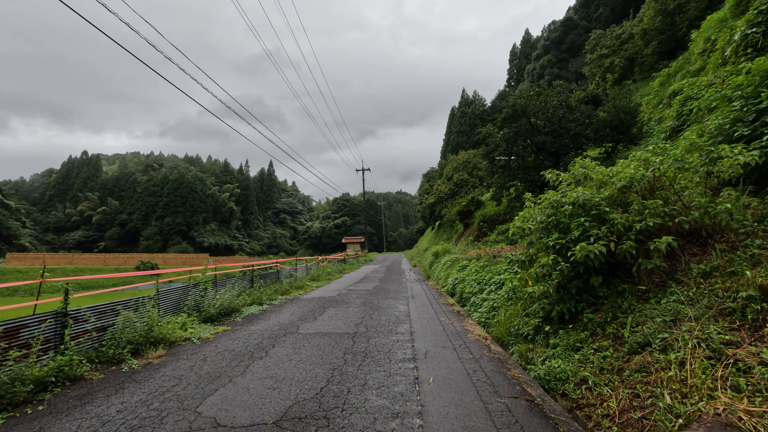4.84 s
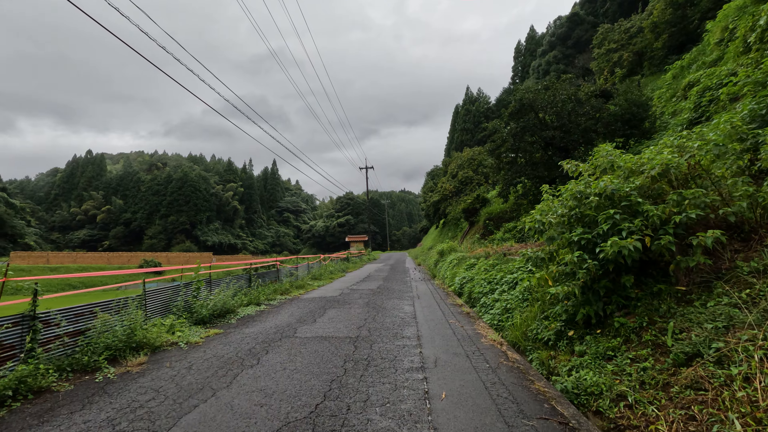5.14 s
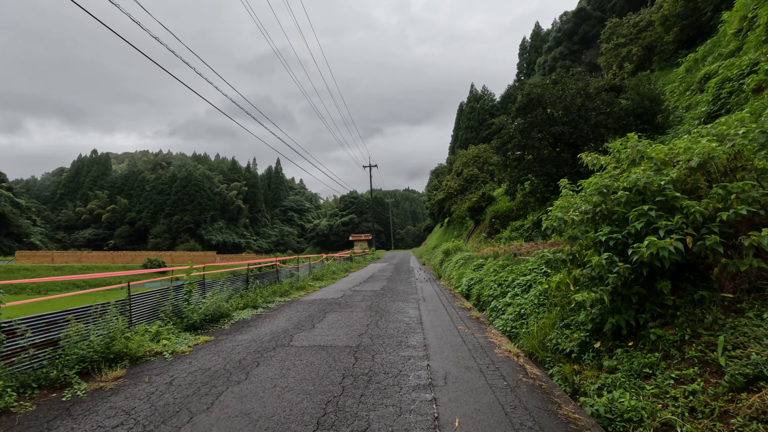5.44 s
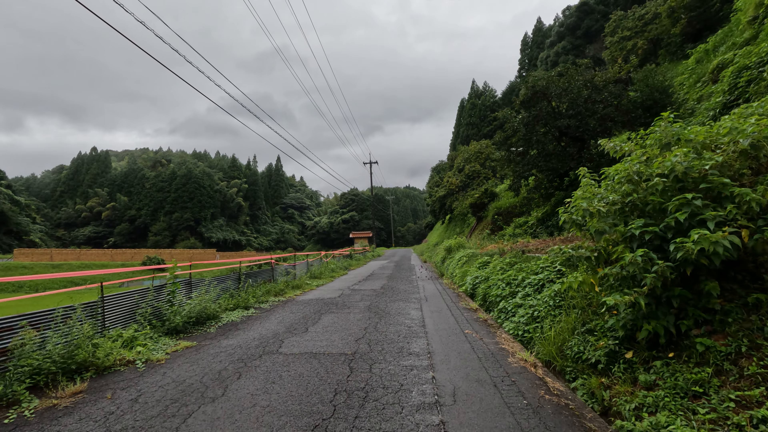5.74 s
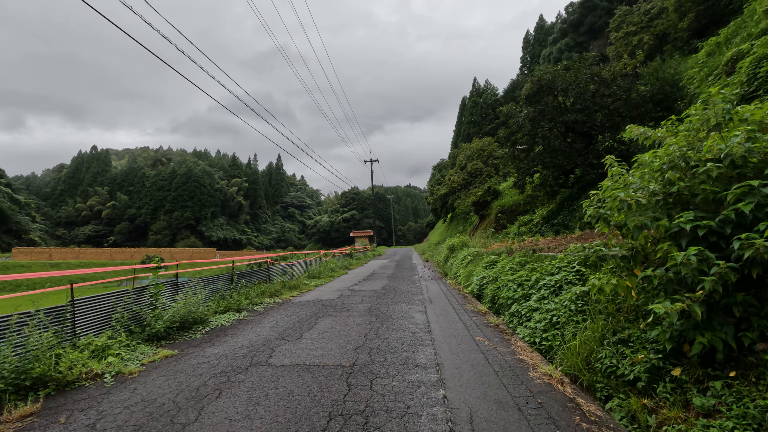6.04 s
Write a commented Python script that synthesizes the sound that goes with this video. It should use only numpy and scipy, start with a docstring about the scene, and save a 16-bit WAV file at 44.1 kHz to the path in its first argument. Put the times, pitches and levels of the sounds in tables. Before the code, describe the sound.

Footsteps on a damp paved country road run from start to end, about six seconds, at roughly two steps a second. Each is a soft, low thud with a little grit grinding under the sole; the crunchiest come at about 1, 2 and 2.5 seconds. All around, distant crickets blend into a steady high shimmer. Nearer ones stand out: a few slurred notes on the left in the first half second, a fast pipping trill that fades by 2 seconds, and rolling chirps from about 0.6 seconds onward, mixed with quicker, higher chirps in short bouts. Very faint, thin insect buzzes occur between 0.8 and 2 seconds. Another pipping trill emerges near 3.7 seconds and becomes strong from 4.9 seconds, with a thin trill on the right. Air rumbles softly throughout on the moving microphone, pulsing slightly after each footfall.

```python
"""A damp country road between fields and a wooded bank. Someone walks along it: each step thuds and
grinds a little grit on the asphalt. Crickets sing all around, drawing scraper over file: a few near
ones in down-swept syllables, many far off as a steady shimmer. Air rumbles softly on the moving
microphone, which bobs after each footfall."""
import sys
import numpy as np
from scipy import signal
from scipy.fft import rfft, irfft, next_fast_len
from scipy.io import wavfile
from scipy.ndimage import uniform_filter1d

SR = 44100
rng = np.random.default_rng(int(sys.argv[2]) if len(sys.argv) > 2 else 0)


def transcribe(u):
    """Save the signal u as a 16-bit wav file named by the first command-line argument.

    u: samples, shape (n,) or (channels, n), limited to [-1, 1]; the rate is SR.
    q: integer samples, one column per channel.
    """
    v = np.clip(np.atleast_2d(u).T, -1, 1)
    q = np.round(v * 32767).astype(np.int16)
    wavfile.write(sys.argv[1], SR, q)


N = 267995
FFT_SIZE = next_fast_len(N, True)
TIME_S = np.arange(N) / SR
FREQS_HZ = np.maximum(np.fft.rfftfreq(FFT_SIZE, 1 / SR), 1)

# Each row: heel strike in seconds, heel thud in dB, its pitch in Hz, heel grit in dB, crunch pitch in Hz,
# heel-to-sole delay in seconds, sole thud in dB, sole grit in dB. Levels are relative.
STEPS = [(0.022, -28, 149.4, -42.5, 1420, 0.061, -31.5, -41.5),
         (0.551, -29, 163, -43.5, 1100, 0.021, -28.5, -55),
         (1.001, -40.5, 215.5, -28.5, 980, 0.054, -28, -41.5),
         (1.571, -26.5, 244, -39, 1070, 0.067, -36, -44.5), (2.023, -30, 240, -29, 1220, 0.056, -27, -40),
         (2.519, -33, 330, -34.5, 1060, 0.068, -31, -31), (3.105, -31, 143, -38.5, 1630, 0.064, -28, -48.5),
         (3.608, -28, 223, -41, 1410, 0.015, -30.5, -35), (4.146, -29, 160, -40, 1280, 0.060, -30, -39.5),
         (4.669, -35.5, 115, -43.5, 950, 0.063, -29.5, -41),
         (5.175, -29, 124, -43, 1510, 0.073, -35, -45.5), (5.699, -31, 111, -39.5, 1370, 0.081, -30, -39)]


def walker(roll_db=-17, scuff_db=-17, crackle_db=-30):
    """Thuds and grit; the sole rolls on after each thud and scuffs more with more load and grit."""
    touches = contacts()
    load = pressure([(s, db) for s, db, *_ in touches], settle_s=0.038, brush_s=0.013)
    rubs = [(s, (thud_db + grit_db) / 2) for s, thud_db, _, grit_db, _ in touches]
    rubbing = pressure(rubs, settle_s=0.041, brush_s=0.051)
    roll = from_db(roll_db) * unit_rms(band(rng.standard_normal(N), 88, 335, order=3))
    scuff = from_db(scuff_db) * unit_rms(band(rough_noise(depth_db=3.9, rate_hz=200), 246, 1410))
    crackle = from_db(crackle_db) * unit_rms(band(rough_noise(depth_db=7.6, rate_hz=460), 2000, 3160))
    gritty = scattered(grit() + rubbing * (scuff + crackle), tail_db=-10.5, t60_s=0.19, early_db=-14)
    return thuds() + load * roll + panned(gritty, pan_db=-3)


def contacts(sole_hz=164, stone_hz=1600, settle_s=0.019, toe_s=0.16):
    """Every touch of shoe on road: time in s, thud in dB and Hz, grit in dB and Hz."""
    # Loose stones underfoot. Each row: time in seconds, thud and grit in relative dB.
    stones = [(0.651, -41, -43.5), (1.033, -32.5, -42), (1.101, -34.5, -39.5), (2.053, -29, -35),
              (2.126, -32.5, -33.5), (2.661, -34.5, -49.5), (3.337, -56, -45.5), (5.154, -47, -42)]
    rows = [(s, thud_db, sole_hz, grit_db, stone_hz) for s, thud_db, grit_db in stones]
    for s, heel_db, heel_hz, heel_grit_db, crunch_hz, delay_s, sole_db, sole_grit_db in STEPS:
        rows += [(s, heel_db, heel_hz, heel_grit_db, crunch_hz),
                 (s + settle_s, heel_db - 10, sole_hz, -51.5, crunch_hz),  # heel settles
                 (s + delay_s, sole_db, sole_hz, sole_grit_db, crunch_hz),
                 (s + toe_s, -40.5, 112, -59.5, crunch_hz)]  # toe comes down
    return rows


def thuds(gain_db=3, lag_s=0.002, width_cycles=0.6, weight_db=-7, weight_hz=80,
          knock_db=-9, knock_s=0.008):
    """Each load on the soft sole: a rounded push, a slower one from body weight, a short knock."""
    out = np.zeros(N)
    t = np.arange(-SR // 30, SR // 30) / SR
    age_s = np.maximum(t, 0)
    for s, db, hz, *_ in contacts():
        push = np.cos(2 * np.pi * hz * t) * np.exp(-(t * hz / width_cycles) ** 2)
        weight = np.sin(2 * np.pi * weight_hz * t) * np.exp(-(t * weight_hz / width_cycles) ** 2)
        knock_hz = 330 * rng.uniform(0.7, 1.27)
        knock = np.sin(2 * np.pi * knock_hz * age_s) * np.exp(-age_s / knock_s)
        thud = push + from_db(weight_db) * weight - from_db(knock_db) * knock
        add(out, s + lag_s + t[0], from_db(db + gain_db) * thud)
    return out


def grit(gain_db=-3.1, grain_spread_db=5.5, min_rise_s=0.0038, min_lead_s=0.003, drag_per_db=0.0351):
    """Wet grains crack under the sole in clusters; the lighter the touch, the longer it drags."""
    out = np.zeros(N)
    t = np.arange(SR // 20) / SR
    hardest_db = max(db for *_, db, hz in contacts())
    for s, *_, db, hz in contacts():
        grains = rng.standard_normal(len(t)) * from_db(grain_spread_db * rng.standard_normal(len(t)))
        stretch = 1 + drag_per_db * (hardest_db - db)
        age = t / (min_rise_s * stretch)
        crunch = unit_rms(band(grains, hz * 0.29, hz * 1.3, order=1)) * (age * np.exp(1 - age)) ** 2
        add(out, s - min_lead_s * stretch, from_db(db + gain_db) * crunch)
    return band(out, 200, 3150, order=4) + from_db(-11) * band(out, 3500, 9000)


def pressure(touches, settle_s, brush_s):
    """Shoe load after touches of (s, dB): brushes in, dies away."""
    energy = np.zeros(N)
    for s, db in touches:
        add(energy, s, from_db([2 * db]))
    load = np.sqrt(signal.lfilter([1], [1, -np.exp(-1 / (settle_s * SR))], energy + 1e-18))
    return uniform_filter1d(load, size=int(brush_s * SR))


def add_syllable(track, middle_s, db, hz, fall, length_s, rough, grip_db=3.5):
    """One wing stroke: the scraper slows along the file, so the tone falls; its grip is uneven."""
    progress = np.linspace(0, 1, max(int(length_s * SR), 8))
    wobble, grip = (np.interp(progress, np.linspace(0, 1, 8), row) for row in rng.standard_normal((2, 8)))
    sweep = 3 / 8 - (progress + progress ** 2) / 2
    pitch_hz = hz * (1 + fall * sweep + rough * wobble)
    envelope = from_db(db + grip_db * grip) * np.sin(np.pi * progress)
    add(track, middle_s - length_s / 2, envelope * np.sin(2 * np.pi * np.cumsum(pitch_hz) / SR))


def low_cricket(chirp_period_s=0.258, syllables_per_s=47, climb=0.0099, taper_db=0.87, gain_db=6):
    """Rolling eight-syllable chirps that swell and trail off, climbing a little in pitch."""
    # Each row: first and last chirp in seconds.
    bouts = [(0.643, 5.275), (5.58, 5.838)]
    # Song as the walker passes. Each row: time in seconds, relative level in dB, pitch in Hz.
    song = [(0.6, -50, 3880), (2.1, -51.5, 3784), (2.9, -47, 3805), (4.5, -45, 3810), (5.1, -44, 3890),
            (5.7, -53, 3895)]
    times_s, levels_db, pitches_hz = np.transpose(song)
    out = np.zeros(N)
    for first_s, last_s in bouts:
        for s in call_times(first_s, last_s, chirp_period_s):
            for k in range(-3, 5):
                jitter, detune, stray_db = rng.standard_normal(3)
                hz = np.interp(s, times_s, pitches_hz) * (1 + climb * k + 0.0066 * detune)
                db = np.interp(s, times_s, levels_db) + gain_db - taper_db * k * k + stray_db
                middle_s = s + k / syllables_per_s + 0.0004 * jitter
                add_syllable(out, middle_s, db, hz, fall=0.21, length_s=0.026, rough=0.012)
    return panned(scattered(out, tail_db=-13, t60_s=0.074), pan_db=-1.5)


def quick_crickets(chirp_period_s=0.139, syllables_per_s=67, sag=0.015, taper_db=0.95, gain_db=3):
    """Chirps of five steeply falling syllables; strength and pitch vary from chirp to chirp."""
    # Each row: first and last chirp in seconds, relative level in dB, pitch in Hz.
    bouts = [(0.185, 0.905, -44.3, 4790), (1.154, 1.258, -48, 5150), (1.684, 2.26, -43.5, 5170),
             (2.02, 2.73, -45, 4720), (2.64, 3.05, -44.5, 5070), (3.23, 3.65, -50, 5120),
             (3.875, 4.93, -47.5, 4920), (5.33, 5.59, -46.5, 5330), (5.73, 5.995, -43, 5200)]
    out = np.zeros(N)
    for first_s, last_s, bout_db, bout_hz in bouts:
        for s in call_times(first_s, last_s, chirp_period_s):
            weakness, tuning = rng.standard_normal(2)
            for k in range(-2, 3):
                jitter, detune, stray_db = rng.standard_normal(3)
                db = bout_db + gain_db - 0.6 * weakness - taper_db * k * k + stray_db
                hz = bout_hz * (1 + 0.0078 * tuning - sag * k + 0.009 * detune)
                middle_s = s + k / syllables_per_s + 0.0004 * jitter
                add_syllable(out, middle_s, db, hz, fall=0.27, length_s=0.013, rough=0.01)
    return panned(scattered(out, tail_db=-8.5, t60_s=0.045, early_db=-6.5), pan_db=-2.8)


def slurring_cricket(period_s=0.069):
    """A few long, slow wing strokes from the field side."""
    # Each row: first and last note in seconds, level in dB.
    bouts = [(0.013, 0.358, -42.5), (0.47, 0.53, -50)]
    out = np.zeros(N)
    for first_s, last_s, db in bouts:
        for s in call_times(first_s, last_s, period_s):
            add_syllable(out, s, db, hz=3606, fall=0.164, length_s=0.046, rough=0.005)
    return panned(scattered(out, tail_db=-3, t60_s=0.32), pan_db=5.5)


def steady_crickets():
    """Two pipping crickets, one left behind and one approached, and a thin trill in the verge."""
    # Each row of all three: time in seconds, level in dB.
    behind_levels = [(0, -38.5), (0.45, -43.5), (0.7, -40.5), (1.4, -39), (1.8, -54), (3.5, -67)]
    ahead_levels = [(2.5, -66), (3.7, -51), (4.35, -51), (4.84, -57), (4.89, -42.5), (6.08, -42.5)]
    verge_levels = [(0, -65), (2.5, -62), (4, -62), (5.4, -51.5), (6.08, -54.5)]
    behind = trill(behind_levels, first_s=0.0145, period_s=0.0484, hz=5720, fall=0.03, length_s=0.021)
    ahead = trill(ahead_levels, first_s=0.0265, period_s=0.04775, hz=5910, fall=0.02, length_s=0.018)
    verge = trill(verge_levels, first_s=0.0174, period_s=0.0302, hz=8380, fall=0.18, length_s=0.025,
                  rough=0.012)
    behind = scattered(behind, tail_db=0.5, t60_s=0.073, early_db=-8.5)
    ahead = scattered(ahead, tail_db=-24, t60_s=0.063, early_db=-18)
    verge = scattered(verge, tail_db=-8, t60_s=0.12, early_db=-6)
    return panned(behind + ahead, pan_db=-2) + panned(verge, pan_db=-11.5)


def trill(levels, first_s, period_s, hz, fall, length_s, rough=0.005):
    """An unbroken train of wing strokes following a level curve."""
    out = np.zeros(N)
    for s in np.arange(first_s, N / SR, period_s):
        effort, detune = rng.standard_normal(2)
        db = np.interp(s, *np.transpose(levels)) + 0.49 * effort
        add_syllable(out, s, db, hz * (1 + 0.0035 * detune), fall, length_s, rough)
    return out


def far_chorus(blur_db=-1):
    """Far crickets merge into one shimmering band per kind."""
    # Each row: centre and spread in Hz, level in dB, left minus right in dB, syllables per second.
    choirs = [(3827, 280, -54, -1, 47), (5043, 290, -52, -2.5, 66), (5600, 216, -49.5, -1, 42),
              (7682, 318, -49, -6, 38)]
    out = 0
    for hz, spread_hz, db, pan_db, syllables_per_s in choirs:
        song_band = bell_band(hz, spread_hz)
        distant = scattered(singers(hz, syllables_per_s), tail_db=-1, t60_s=0.49)
        in_band = irfft(rfft(distant, FFT_SIZE) * np.sqrt(song_band), FFT_SIZE)[:, :N]
        voices = unit_rms(in_band) + from_db(blur_db) * wide_noise(song_band)
        out = out + panned(from_db(db) * unit_rms(voices), pan_db)
    return out


def singers(hz, syllables_per_s, duty=0.61, swell_db=1, count=4):
    """Several crickets of one kind, each at its own pitch and pace, swelling and fading."""
    out = np.zeros(N)
    length_s = duty / syllables_per_s
    for detune, slowness, offset in rng.uniform(-1, 1, (count, 3)):
        times_s = np.arange(offset / syllables_per_s, N / SR, (1 + 0.06 * slowness) / syllables_per_s)
        levels_db = swell_db * unit_rms(uniform_filter1d(rng.standard_normal(len(times_s)), size=3))
        stroke = np.zeros(int(SR * length_s) + 2)
        pitch_hz = hz * (1 + 0.04 * detune)
        add_syllable(stroke, length_s / 2, 0, pitch_hz, fall=0.1424, length_s=length_s, rough=0.016)
        times_s += 0.0006 * rng.standard_normal(len(times_s))
        for s, db in zip(times_s, levels_db):
            add(out, s, from_db(db) * stroke)
    return out


def bush_cricket(hz=12250, spread_hz=400, flutter_hz=34, fade_s=0.12):
    """Faint fluttering buzzes high above the chorus."""
    # Each row: start and end in seconds, level in dB.
    buzzes = [(0.78, 1.05, -66.5), (1.22, 1.52, -71), (1.65, 2.1, -75)]
    buzz = wide_noise(bell_band(hz, spread_hz)) * (1 + 0.5 * np.sin(2 * np.pi * flutter_hz * TIME_S))
    envelope = sum(from_db(db) * np.clip(np.minimum(TIME_S - start_s, end_s - TIME_S) / fade_s + .5, 0, 1)
                   for start_s, end_s, db in buzzes)
    return panned(buzz * envelope, pan_db=4.5)


def air(rumble_db=-46.5, hiss_db=-62):
    """Low rumble of still air and faint hiss of the fields."""
    # Each row of both: frequency in Hz, relative spectral density in dB.
    rumble_spectrum = [(25, 1), (45, -3.5), (90, -11), (170, -5.5), (300, -20.5), (600, -33), (1000, -26.5),
                       (1400, -25.5), (2000, -30.5), (3100, -35.5)]
    hiss_spectrum = [(2500, -6), (3200, -5.5), (6400, 6), (8700, 3), (9500, -0.5), (10900, -8.5),
                     (12000, -1.5), (13400, -20), (14600, -10.5)]
    rumble = wide_noise(from_db(on_freqs(rumble_spectrum)) / (1 + (FREQS_HZ / 3300) ** 16))
    hiss = wide_noise(from_db(on_freqs(hiss_spectrum)) * (FREQS_HZ > 2500))
    return from_db(rumble_db) * rumble + panned(from_db(hiss_db) * hiss, pan_db=-1)


def microphone_sway(stir_db=-45, lag_s=0.11, width_s=0.13, bob_db=-33, bob_hz=7.82):
    """After each footfall the microphone bobs and stirs the air."""
    ages_s = np.array([TIME_S - heel_s for heel_s, *_ in STEPS])
    swings = np.exp(-((ages_s - lag_s) / width_s) ** 2)
    bob = sum(swings * np.sin(2 * np.pi * bob_hz * ages_s))
    stir = unit_rms(sum(swings) * wide_noise(FREQS_HZ / (1 + (FREQS_HZ / 15) ** 3)))
    return from_db(stir_db) * stir + from_db(bob_db) * bob


def scattered(x, tail_db, t60_s, early_db=-8, early_t60_s=0.075):
    """Direct sound, early returns from road and leaves, diffuse tail from the bank; in stereo."""
    t = np.arange(SR // 3) / SR
    early, tail = rng.standard_normal((2, 2, len(t)))
    early = unit_rms(early * from_db(-60 * t / early_t60_s))
    tail = unit_rms(tail * from_db(-60 * t / t60_s))
    echoes = (from_db(early_db) * early + from_db(tail_db) * tail) / np.sqrt(len(t))
    return x + signal.oaconvolve(x[None], echoes, axes=1)[:, :N]


def wide_noise(gain):
    """Unit-power stereo noise shaped by gain; alike in the bass, wide in the treble."""
    # Each row: frequency in Hz, left-right correlation.
    likeness = [(25, 0.58), (80, 0.98), (200, 0.96), (600, 0.53), (1500, 0.53), (4000, 0.49), (8000, 0.52),
                (13000, 0.37)]
    alike = np.clip(on_freqs(likeness), 0, 1)
    mid, side = rfft(rng.standard_normal((2, FFT_SIZE)))
    stereo = np.sqrt(1 + alike) * mid + np.sqrt(1 - alike) * side * [[1], [-1]]
    return unit_rms(irfft(gain * stereo, FFT_SIZE)[:, :N])


def rough_noise(depth_db, rate_hz):
    """White noise whose level flickers at up to about rate_hz."""
    noise = rng.standard_normal(N)
    flicker = irfft(rfft(rng.standard_normal(FFT_SIZE)) / (1 + (FREQS_HZ / rate_hz) ** 2), FFT_SIZE)[:N]
    return noise * from_db(depth_db * unit_rms(flicker))


def call_times(first_s, last_s, period_s):
    """Even times that fill a bout, about period_s apart."""
    return np.linspace(first_s, last_s, int(round((last_s - first_s) / period_s)) + 1)


def bell_band(hz, spread_hz):
    """Gaussian band gain on the frequency grid."""
    return np.exp(-((FREQS_HZ - hz) / (2 * spread_hz)) ** 2)


def on_freqs(points):
    """A (Hz, value) table on the frequency grid."""
    hz, value = np.transpose(points)
    return np.interp(np.log(FREQS_HZ), np.log(hz), value)


def band(x, low_hz, high_hz, order=2):
    """Causal band-pass."""
    return signal.sosfilt(signal.butter(order, [low_hz, high_hz], "band", fs=SR, output="sos"), x + 1e-18)


def panned(x, pan_db):
    """Place a sound by left minus right level."""
    return x * from_db([[pan_db / 2], [-pan_db / 2]])


def add(track, start_s, sound):
    """Mix a short sound into a track."""
    at = int(round(start_s * SR))
    first, last = max(at, 0), min(at + len(sound), N)
    if last > first:
        track[first:last] += sound[first - at:last - at]


def from_db(db):
    """Decibels to gain."""
    return 10 ** (np.asarray(db) / 20)


def unit_rms(x):
    """Scale to unit power."""
    return x / np.sqrt(np.mean(x ** 2) + 1e-20)


def scene():
    """Crickets, walker and air."""
    near_crickets = low_cricket() + quick_crickets() + slurring_cricket() + steady_crickets()
    return near_crickets + far_chorus() + bush_cricket() + walker() + air() + microphone_sway()


def record(dry, dip_depth=0.55, dip_hz=790, cutoff_hz=15750):
    """Slightly hollow lower middle; top cut steeply."""
    hollowed = dry - dip_depth * band(dry, dip_hz / 1.17, dip_hz * 1.26, order=1)
    return signal.sosfilt(signal.ellip(10, 0.1, 80, cutoff_hz, fs=SR, output="sos"), hollowed)


dry = scene()
out = record(dry)
transcribe(out)
```